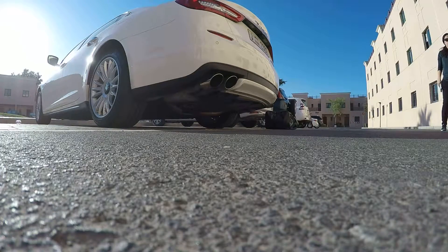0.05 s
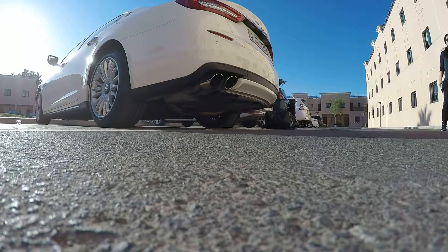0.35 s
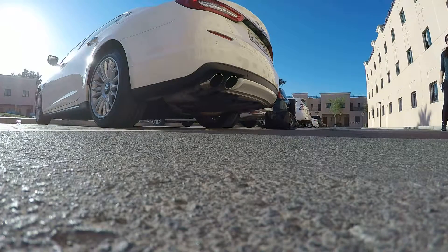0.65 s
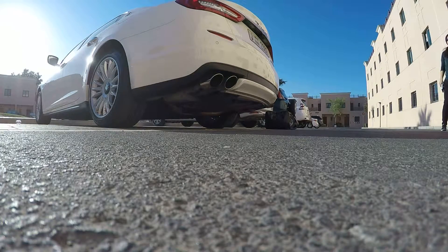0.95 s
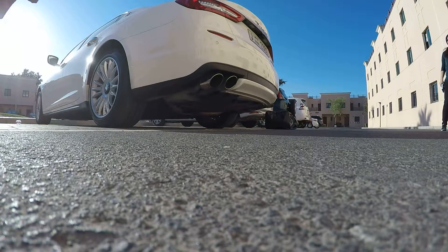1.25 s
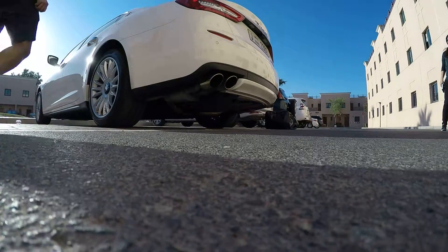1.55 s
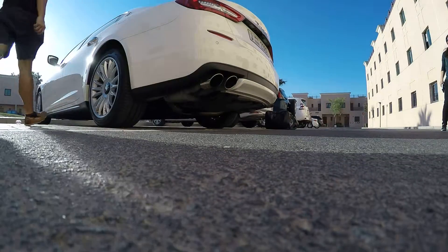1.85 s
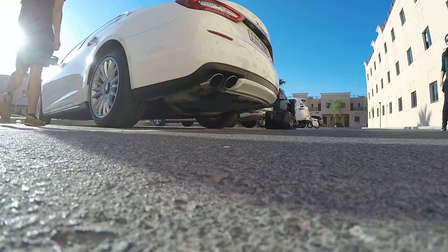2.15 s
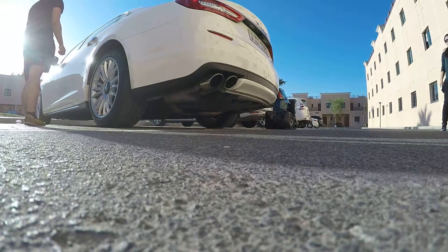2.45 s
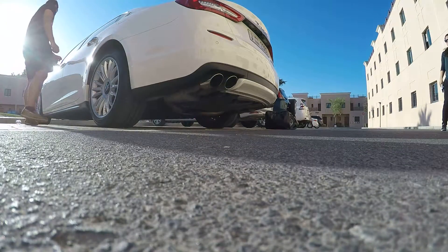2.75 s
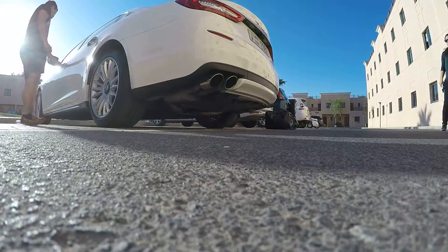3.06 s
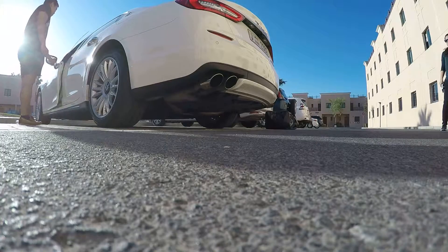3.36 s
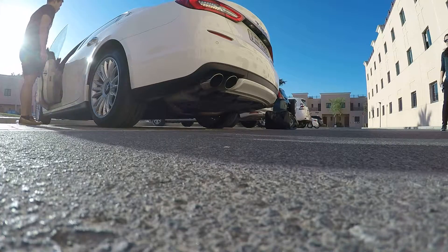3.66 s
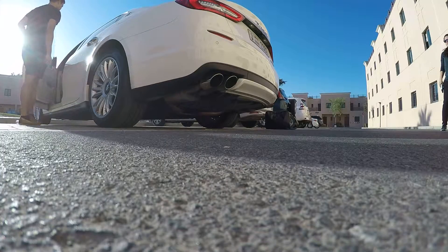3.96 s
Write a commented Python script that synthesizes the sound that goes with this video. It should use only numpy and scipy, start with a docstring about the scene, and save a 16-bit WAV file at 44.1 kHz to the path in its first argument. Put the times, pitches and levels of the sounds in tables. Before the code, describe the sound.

A car door unlatches and clunks open outdoors, after footsteps, over a low rumble.

```python
"""A car door opening close to a microphone at ground level in a car park.
The handle is pulled, the latch lets go, the seal parts with a low boom, and the door clunks over its stay.
Before that, shoes scuff and crunch on grit as someone walks up to the car.
Birds chirp far off, the walls return a faint tail, and wind and distant traffic rumble throughout."""
import sys
import numpy as np
from scipy import signal
from scipy.fft import rfft, irfft
from scipy.io import wavfile
from scipy.ndimage import uniform_filter1d

SR = 44100
rng = np.random.default_rng(int(sys.argv[2]) if len(sys.argv) > 2 else 0)


def pcm_store(signal):
    """Save signal as 16-bit PCM."""
    levels = np.round(np.clip(np.atleast_2d(signal), -1, 1) * 32767)
    wavfile.write(sys.argv[1], SR, levels.astype(np.int16).T)


N = 176400
T = np.arange(N) / SR
EVENT_T = T[:SR // 2]  # time axis of one short event


def undb(db):
    """Decibels to gain."""
    return 10 ** (np.asarray(db) / 20)


def unit(x):
    """Scale to rms 1."""
    return x / np.sqrt(np.mean(x ** 2))


def at(table, hz, column=1):
    """Read one column of a table on a log-frequency axis."""
    rows = np.array(table, float)
    return np.interp(np.log(np.maximum(hz, 1)), np.log(rows[:, 0]), rows[:, column])


def noise(colour, size):
    """Noise of rms 1 with a spectrum of (Hz, dB) points."""
    gain = undb(at(colour, np.fft.rfftfreq(size, 1 / SR)))
    return unit(irfft(rfft(rng.standard_normal(size)) * gain, size))


def half_octaves(x):
    """Split a sound into overlapping half-octave bands: (centre Hz, band)."""
    octave = np.log2(np.maximum(np.fft.rfftfreq(len(x), 1 / SR), 1))
    spectrum = rfft(x)
    for centre in np.arange(4, 14.5, .5):
        yield 2 ** centre, irfft(spectrum * np.maximum(1 - 2 * abs(octave - centre), 0), len(x))


def wander(rate_hz):
    """A curve of rms 1 that glides between random values."""
    hold = int(SR / rate_hz)
    steps = np.repeat(rng.standard_normal(N // hold + 1), hold)
    return unit(uniform_filter1d(steps, hold)[:N])


def fade(t60, rise=0.00047):
    """Linear rise, then an exponential decay; both times in seconds."""
    return np.minimum(EVENT_T / rise, 1) * np.exp(-np.log(1000) * np.maximum(EVENT_T - rise, 0) / t60)


def place(start, x):
    """Put a sound at its time in the scene, in seconds."""
    return np.concatenate([np.zeros(max(int(start * SR), 0)), x, np.zeros(N)])[:N]


def burst(colour, db, t60):
    """A brief scrape or click of decaying noise."""
    return undb(db) * noise(colour, len(EVENT_T)) * fade(t60)


def ring(modes):
    """Decaying modes of a struck part, alternating in sign."""
    return sum((-1) ** k * undb(db) * np.sin(2 * np.pi * hz * EVENT_T) * fade(t60, rise=.004)
               for k, (hz, db, t60) in enumerate(modes))


def clatter(table):
    """Dense unresolved modes: every band builds up and dies at its own rate."""
    out = 0
    for hz, band in half_octaves(rng.standard_normal(len(EVENT_T))):
        db, rise, t60 = (at(table, hz, column) for column in (1, 2, 3))
        bass_rolloff = min(hz / table[0][0], 1) ** 2
        out += unit(band) * undb(db) * bass_rolloff * fade(t60, rise)
    return out


# Wind and distant traffic, heard at ground level (frequency [Hz], relative level [dB])
RUMBLE_COLOUR = [(10, -20), (20, -3.5), (30, 0), (45, -3), (88, -5), (130, -10.5), (170, -10.5), (215, -16),
                 (285, -15.5), (360, -20.5), (500, -22.5), (640, -25), (1000, -26), (1400, -31.5),
                 (2200, -40.5), (3400, -45), (6000, -55), (10000, -60), (15000, -63.5)]

def wind_and_traffic(db=-35.5, swell_db=.25, flicker_db=1.16, smooth_hz=4000):
    """Steady rumble: the bands swell together, each low one flickers, and the hiss stays smooth."""
    swell = swell_db * wander(rate_hz=2.04)
    out = 0
    for hz, band in half_octaves(noise(RUMBLE_COLOUR, N)):
        flicker = flicker_db * wander(rate_hz=14)
        out += band * undb((swell + flicker) / (1 + hz / smooth_hz))
    return undb(db) * unit(out)


# Echo of the walls around the car park (frequency [Hz], relative level [dB])
WALL_COLOUR = [(100, 7), (600, -4), (3000, -8.5), (7000, -12.5), (15000, -11)]

def wall_reflections(direct, db=-23):
    """The surrounding walls send a faint, diffuse tail back to the microphone."""
    tail = noise(WALL_COLOUR, len(EVENT_T)) * fade(t60=.45, rise=.025)
    return undb(db) * signal.fftconvolve(direct, tail / np.linalg.norm(tail))[:N]


# Birds far off (time [s], length [s], start pitch [Hz], end pitch [Hz], level [dB], rasp [Hz])
CHIRPS = [(.428, .066, 2560, 2200, -55, 35), (.722, .072, 2640, 2190, -56, 45),
          (1.259, .075, 5300, 4300, -58, 800), (1.28, 0.07, 3900, 3300, -58, 250),
          (3.834, .016, 5400, 5000, -60, 300)]

def birds():
    """Chirps that fall quickly and flatten out; pitch jitter makes some of them raspy."""
    out = 0
    for start, length, high_hz, low_hz, db, rasp_hz in CHIRPS:
        progress = np.clip((T - start) / length, 0, 1)
        hz = low_hz + (high_hz - low_hz) * (1 - progress) ** 2.7 + rasp_hz * wander(rate_hz=1500)
        envelope = np.sqrt(abs(np.sin(np.pi * progress)))
        out += undb(db) * envelope * np.sin(2 * np.pi * np.cumsum(hz) / SR)
    return out


# Shoes on the asphalt near the microphone (time [s], level [dB])
SCUFF_LEVELS = [(0, -70), (.06, -55.5), (.14, -62.5), (.36, -61.5), (.46, -68), (.52, -60.5), (.75, -60.5),
                (.92, -65), (1.15, -73), (1.5, -66), (1.75, -80)]
# Their hiss (frequency [Hz], relative level [dB])
SCUFF_COLOUR = [(800, -18), (2000, 0), (3300, 2.5), (5200, -1.5), (7200, -9.5), (10000, -9), (15000, -14)]

def scuffing():
    """Soles rub over asphalt with a grainy hiss."""
    grain = np.exp(.15 * wander(rate_hz=900))
    level_db = np.interp(T, *np.array(SCUFF_LEVELS).T)
    return unit(noise(SCUFF_COLOUR, N) * grain) * undb(level_db)


# Steps coming up to the car (time [s], level [dB])
FOOTFALLS = [(.055, -28), (1.326, -34.5), (1.535, -39)]
# Thud of a sole (frequency [Hz], relative level [dB], t60 [s])
SOLE_MODES = [(184, -0.5, .055), (309, -4, 0.024), (476, -9, 0.028), (910, -16.5, .04)]

def footfalls():
    """Each sole lands with a soft, quickly damped thud."""
    return sum(place(start, undb(db) * ring(SOLE_MODES)) for start, db in FOOTFALLS)


# Grit on the ground nearby (time [s], level [dB], t60 [s], tilt [dB/octave])
GRIT_CRACKS = [(.204, -53, .11, 6.5), (.4995, -51.5, .016, 6), (0.8092, -35, .009, 0), (.839, -42, .02, -1),
               (.846, -46, .025, 1), (.855, -50, .01, 1.5), (1.232, -43, .014, -5), (1.434, -38, 0.019, -1),
               (1.4398, -42.5, 0.037, 2.3), (2.577, -54.5, .14, 0.5)]
# One crack before its tilt (frequency [Hz], relative level [dB])
GRIT_COLOUR = [(500, -14), (1400, 3), (2400, 0.5), (4500, -6.5), (8000, -15.5), (15000, -23)]

def grit():
    """Grit cracks under the soles, each burst with its own brightness."""
    out = 0
    for start, db, t60, tilt in GRIT_CRACKS:
        colour = [(hz, level + tilt * np.log2(hz)) for hz, level in GRIT_COLOUR]
        out += place(start, burst(colour, db, t60))
    return out


# Hand on the door handle, close by (time [s], level [dB], t60 [s])
HANDLE_KNOCKS = [(3.129, -44.5, .06), (3.162, -44, .11), (3.184, -43.5, .15), (3.209, -40.5, .08),
                 (3.329, -43, 0.056)]
# One knock (frequency [Hz], relative level [dB])
HANDLE_COLOUR = [(150, -1), (400, 8.5), (1300, -3), (2500, -8), (5000, -17), (8000, -30), (15000, -39)]

def door_handle():
    """A hand takes up the handle in a few dull knocks."""
    return sum(place(start, burst(HANDLE_COLOUR, db, t60)) for start, db, t60 in HANDLE_KNOCKS)


# Latch rattle, close by (frequency [Hz], band level [dB], rise [s], t60 [s])
LATCH_CLATTER = [(200, -30.5, .003, .11), (450, -37, 0.0027, .1), (1000, -39, .011, .13),
                 (2000, -39.5, .008, .125), (3600, -41.5, 0.0035, .11), (5500, -59, .003, .07),
                 (14000, -57, .003, .04)]
# Latch resonances (frequency [Hz], level [dB], t60 [s])
LATCH_MODES = [(283, -29.5, 0.099), (315, -30.5, .11), (566, -37, .11), (1005, -36.5, .08),
               (1545, -37.5, .09), (1785, -38, .09), (1850, -39, .09), (2176, -41, .07), (2950, -47, .09),
               (3250, -43.5, .09), (3440, -43, .08), (3915, -46, .06)]

def door_latch():
    """The latch lets go, and its parts clatter and ring."""
    return place(3.2425, clatter(LATCH_CLATTER) + ring(LATCH_MODES))


# Cabin air, heard from beside the car (frequency [Hz], level [dB], t60 [s])
CABIN_MODES = [(27, -21.5, .62), (56, -26, .2), (88, -25, .19)]

def door_seal():
    """The seal parts and the cabin air booms."""
    return place(3.2555, ring(CABIN_MODES))


# Tick of the door stay, close by (frequency [Hz], relative level [dB])
TICK_COLOUR = [(1000, -4), (2500, -1), (4200, 3), (5500, -11.5), (8000, -19.5), (15000, -27)]

def door_stay():
    """A faint, brief hiss leads into the tick of the stay's roller over its notch."""
    hiss = undb(-42) * noise(TICK_COLOUR, len(EVENT_T)) * fade(.04, .017) ** 2
    tick = burst(TICK_COLOUR, db=-27, t60=.028)
    return place(3.648, hiss) + place(3.6638, tick)


# Door panel rattle, close by (frequency [Hz], band level [dB], rise [s], t60 [s])
PANEL_CLATTER = [(200, -31, 0.011, .14), (450, -25.5, .013, .1), (1100, -31.5, .009, 0.11),
                 (2200, -35, .009, .12), (3700, -41.5, .002, .095), (5800, -51.5, .002, 0.14),
                 (14000, -62, .002, 0.12)]
# Panel resonances (frequency [Hz], level [dB], t60 [s])
PANEL_MODES = [(124, -26, .33), (152, -23, .15), (267.7, -22, .14), (443.5, -25, 0.12), (524, -25, .11),
               (587, -30.5, .1), (730, -31, .13), (810, -28, .13), (1172, -26, .09), (1345, -34, .09),
               (1650, -39, 0.084), (2003, -36, .1), (2422, -32.5, 0.089), (3748, -41, .07),
               (4100, -42, .07)]

def door_panel():
    """The panel clunks just after the stay passes its notch."""
    return place(3.669, clatter(PANEL_CLATTER) + ring(PANEL_MODES))


def scene():
    """Door, shoes and birds with their wall reflections, over the rumble, at one microphone."""
    door = door_handle() + door_latch() + door_seal() + door_stay() + door_panel()
    shoes = scuffing() + footfalls() + grit()
    direct = door + shoes + birds()
    return (direct + wall_reflections(direct) + wind_and_traffic())[None]


def record(dry):
    """The camera cuts the top of the treble steeply."""
    top_hz = 15300
    return signal.sosfilt(signal.ellip(10, .2, 70, top_hz, fs=SR, output="sos"), dry)


dry = scene()
out = record(dry)
pcm_store(out)
```